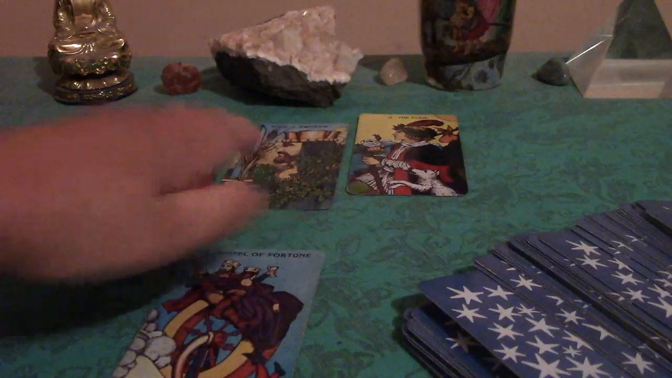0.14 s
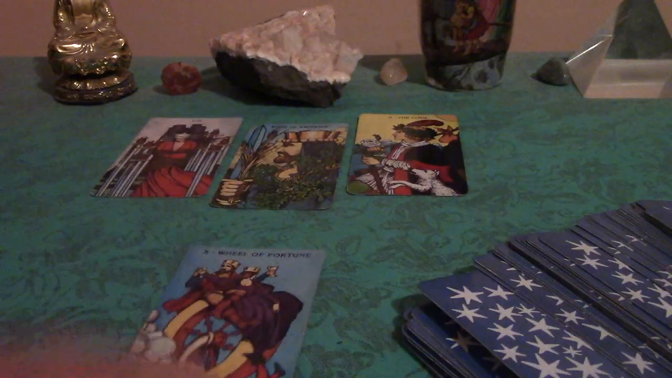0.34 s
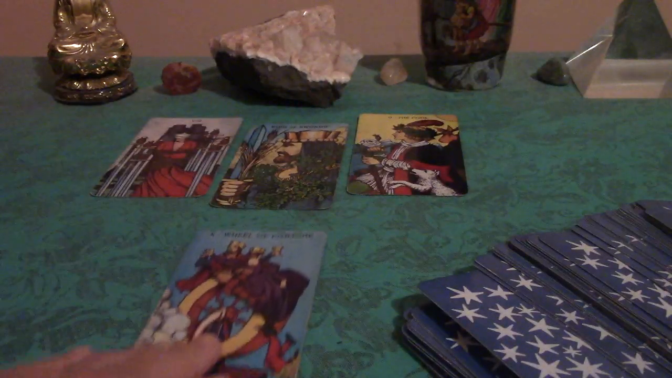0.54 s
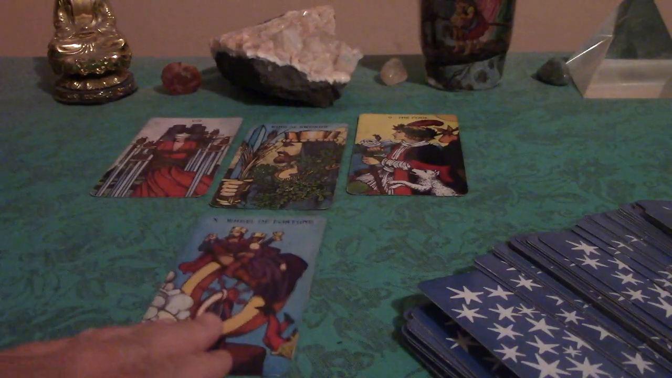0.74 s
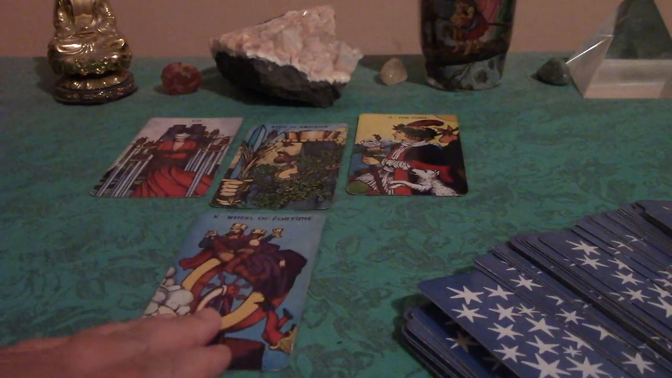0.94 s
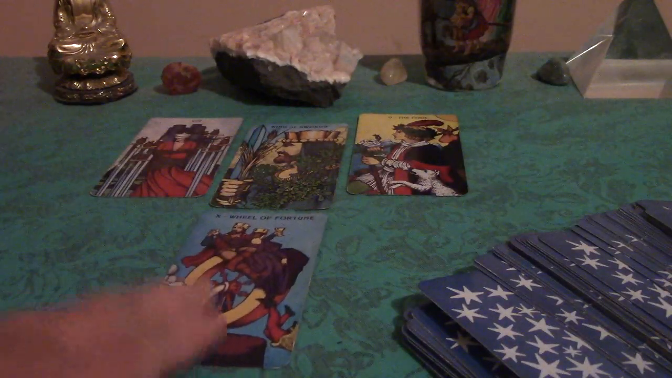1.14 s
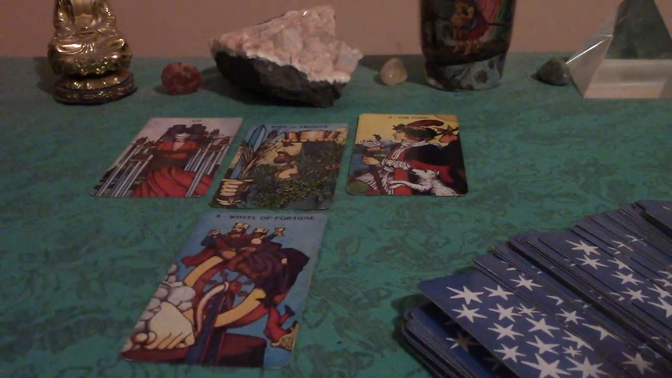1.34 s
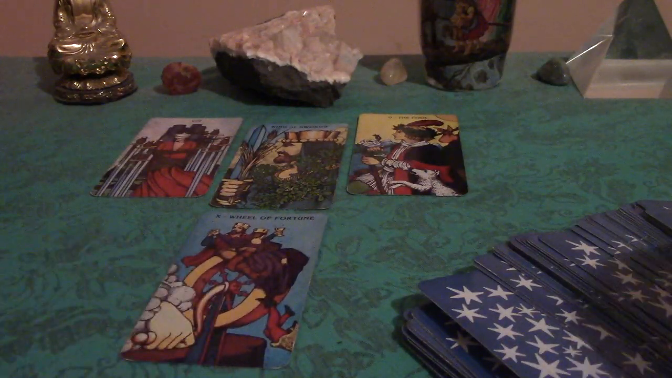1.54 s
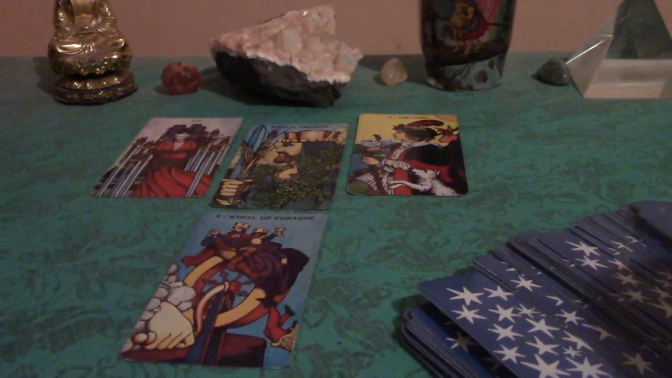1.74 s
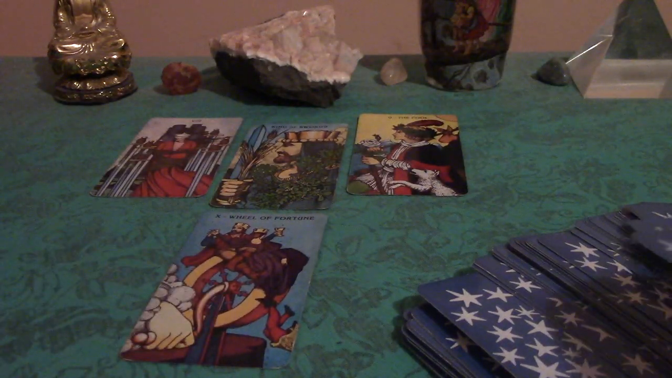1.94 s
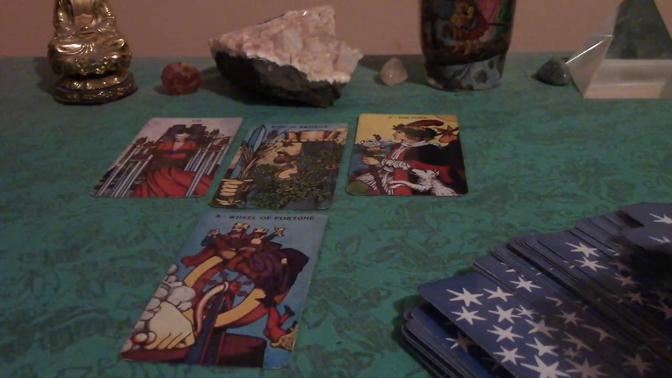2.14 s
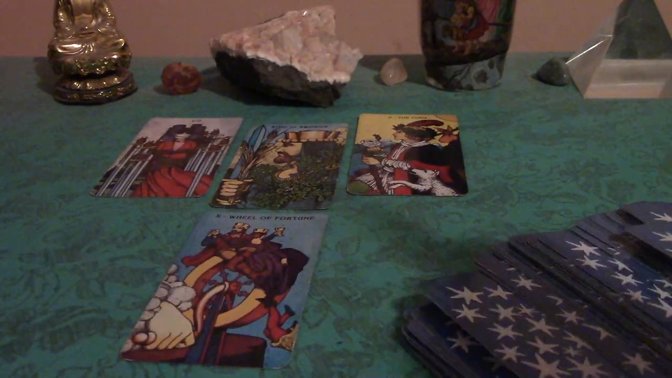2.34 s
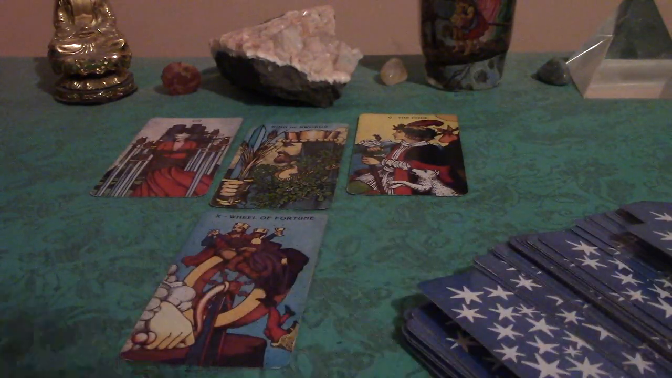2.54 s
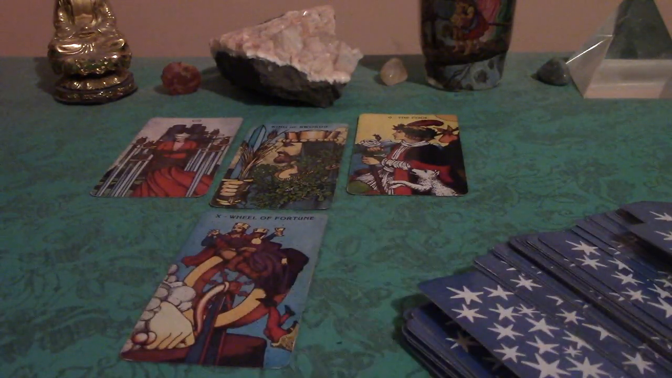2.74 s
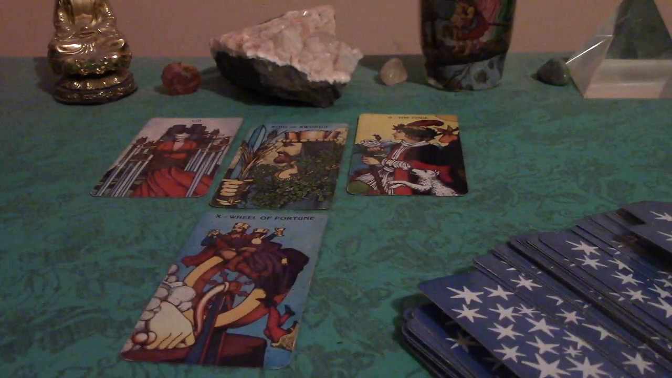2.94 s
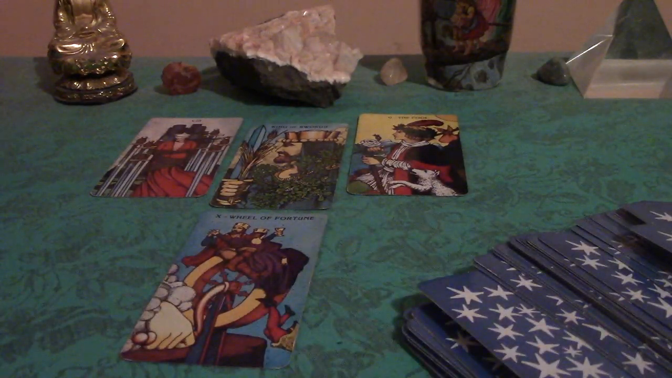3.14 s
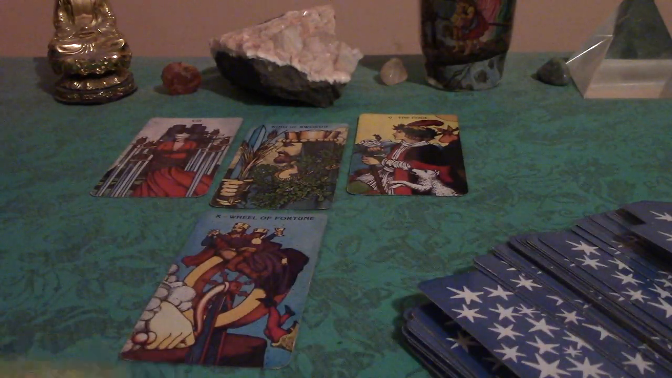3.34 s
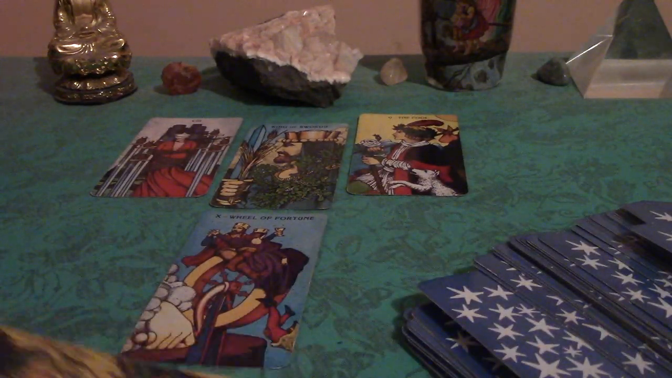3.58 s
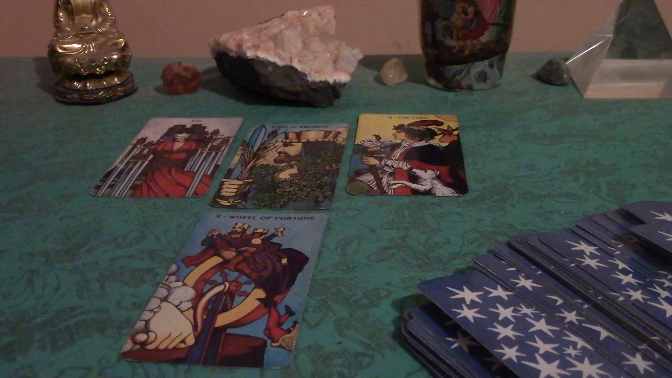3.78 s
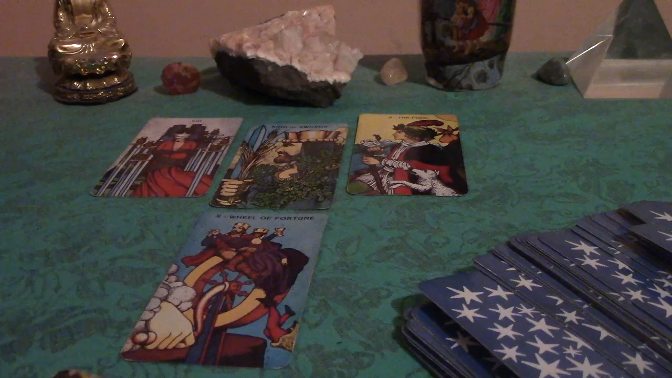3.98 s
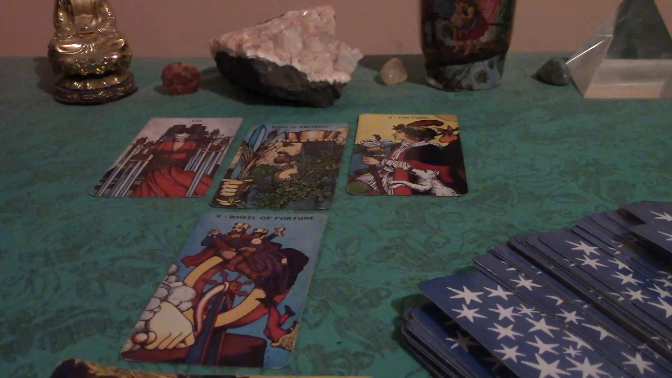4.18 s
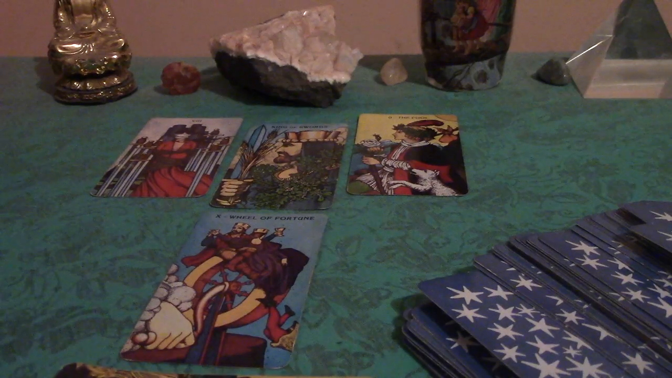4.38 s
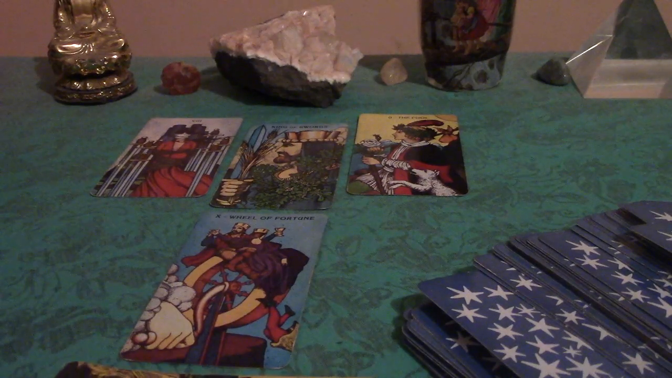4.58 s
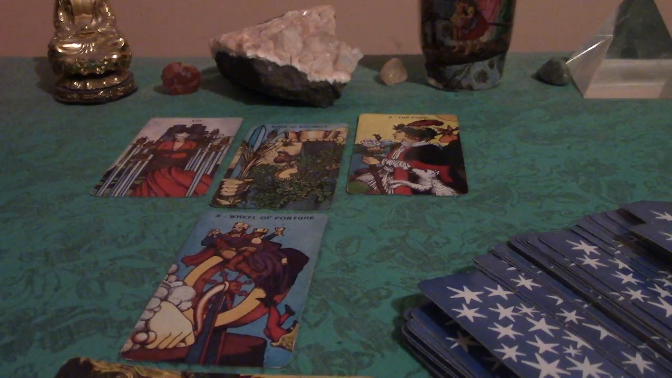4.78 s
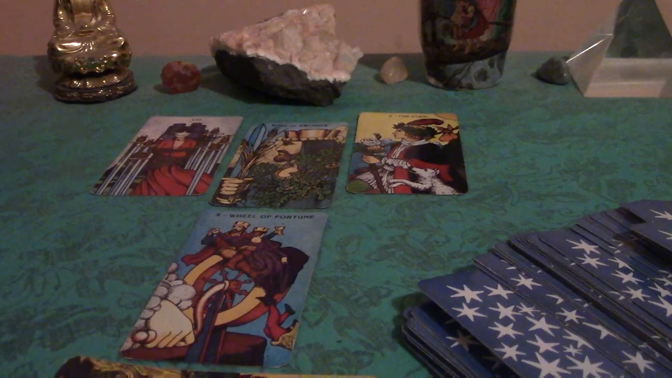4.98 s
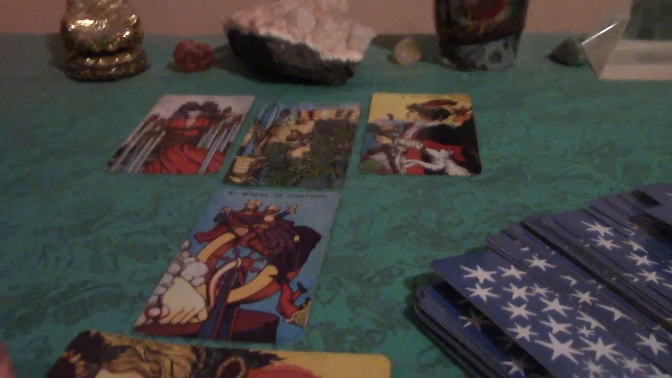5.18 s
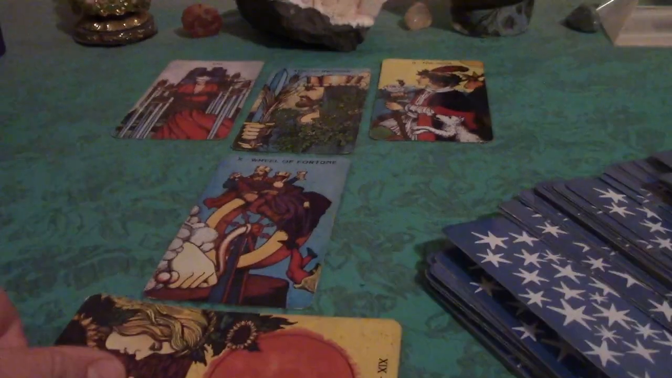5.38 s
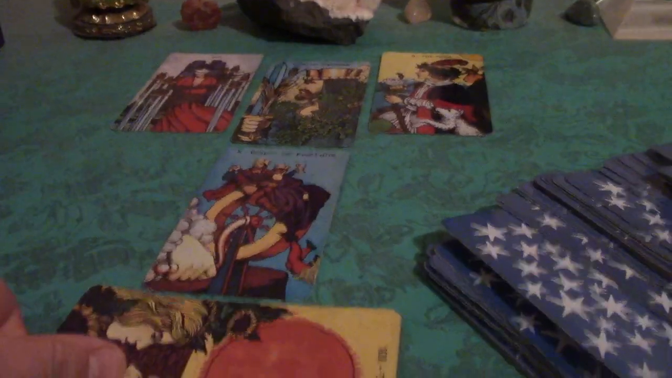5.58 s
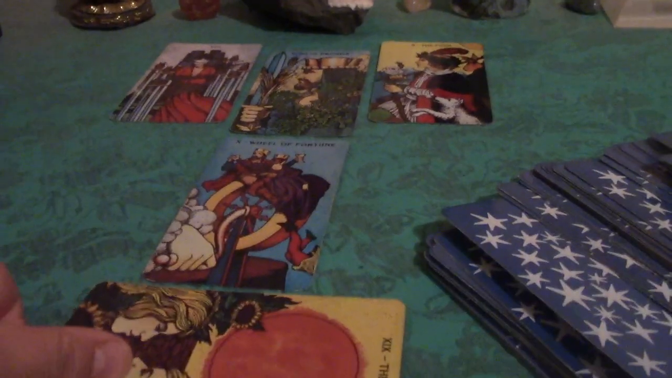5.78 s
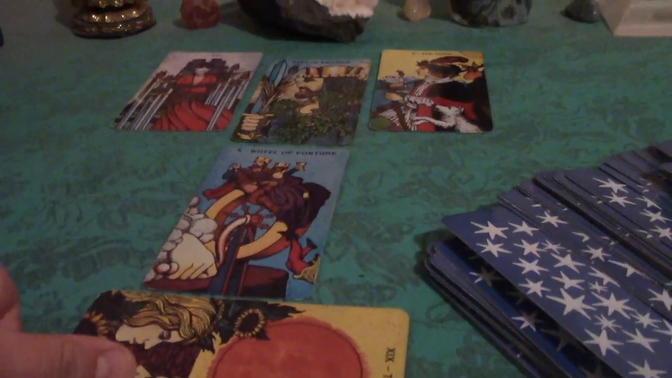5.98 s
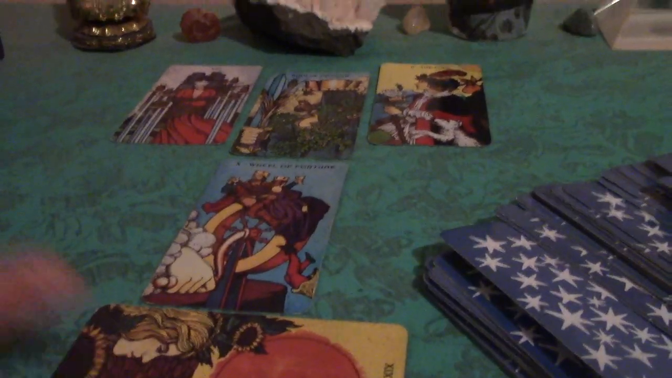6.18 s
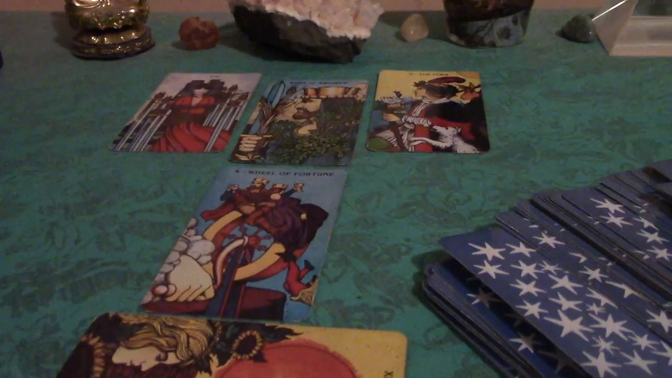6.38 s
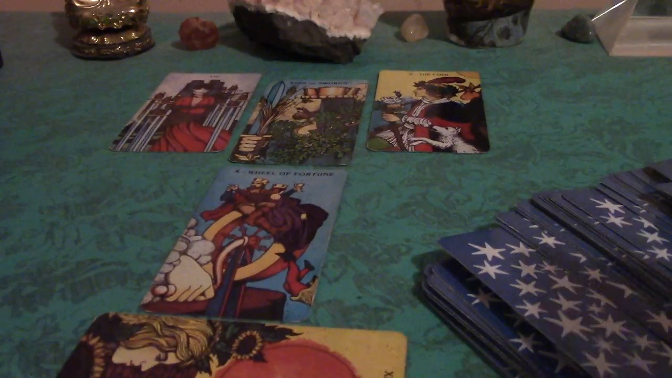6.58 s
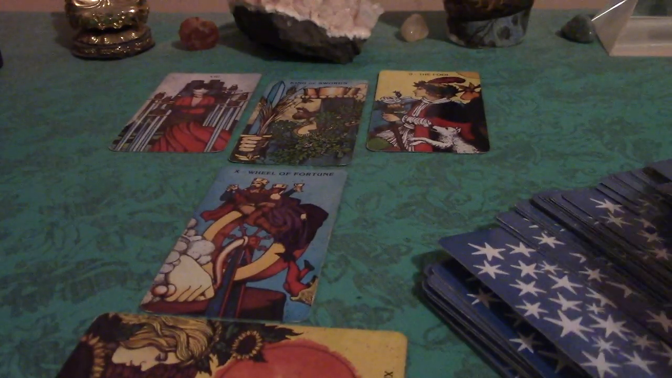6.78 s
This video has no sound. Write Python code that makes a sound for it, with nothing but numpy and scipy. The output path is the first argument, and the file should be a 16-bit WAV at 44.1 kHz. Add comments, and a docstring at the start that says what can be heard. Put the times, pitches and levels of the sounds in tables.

```python
"""A small, quiet room hums throughout. On a cloth-covered table, one tarot card is pushed into place;
another is drawn from the fanned deck, laid down and slid. Card faces hiss, card edges rasp, and fingers
and cards tap softly. Near 5 s a hand rubs a camera's plastic mount, very close by, and tilts it. The
joint sticks and slips, creaking in three flurries of sharp clicks. The fingertip squeaks as it lets go,
and two soft taps follow."""
import sys
import numpy as np
from scipy import signal
from scipy.fft import rfft, irfft, next_fast_len
from scipy.io import wavfile
from scipy.ndimage import map_coordinates

SR = 44100
rng = np.random.default_rng(int(sys.argv[2]) if len(sys.argv) > 2 else 0)


def wrap_up_sound(samples):
    """Save the sound to the file named by the first command line argument, as 16-bit audio."""
    columns = np.atleast_2d(samples).T
    # keep every value between -1 and 1, then stretch to whole-number steps
    tamed = np.clip(columns, -1, 1)
    steps = np.round(tamed * 32767).astype(np.int16)
    wavfile.write(sys.argv[1], SR, steps)


N = 300762

# tone of the room's hum: (frequency [Hz], level [dB])
HUM_TONE = [(12, -39.5), (20, -22.5), (96, -11.5), (120, 0), (154, -5), (204, 0), (367, -3.5), (446, -2.5),
            (660, -5.5), (1060, -7.5), (1260, -7.5), (1960, -13.5), (2910, -15.5), (8180, -22.5),
            (16000, -33)]
# stereo width of the room, then of direct sounds: (frequency [Hz], side minus middle [dB])
ROOM_WIDTH = [(30, -2.5), (100, -11), (400, -6), (3000, -8.5), (7000, -10.5), (14000, -31)]
DIRECT_WIDTH = [(40, -1), (100, -19), (300, -25), (600, -17), (1200, -15), (2400, -10), (4400, -18),
                (14000, -18)]
# how long the room echoes: (frequency [Hz], time to fade by 60 dB [s])
ECHO_TIMES = [(150, 0.4), (1000, 0.26), (5000, 0.17), (14000, 0.273)]

# cards sliding on cloth or on other cards: (start [s], end [s], fade time [s], hiss [dB], rasp [dB])
CARD_SLIDES = [(.335, .68, .11, -60, -68), (0.845, 1.08, .025, -68.5, -79), (1.53, 1.74, .04, -80, -69),
               (1.97, 2.32, .03, -67, -64), (2.078, 2.114, .018, -57.5, -59), (3.579, 3.78, .025, -60, -55),
               (3.79, 4.135, .014, -61, -63.5)]
# quick card strokes that swell and break off: (break time [s], swell time [s], hiss [dB], rasp [dB])
CARD_FLICKS = [(2.225, 0.027, -41.5, -39.5), (2.897, 0.042, -56, -52), (3.047, 0.058, -65, -49),
               (4.15, .08, -62, -75)]
# tone of a card's hissing face, then of its rasping edge: (frequency [Hz], level [dB])
HISS_TONE = [(1000, -32.5), (3000, 0), (4500, -2.5), (6000, 5.5), (8000, 3), (9500, -3), (11500, -5),
             (13000, -11), (16000, -11)]
RASP_TONE = [(150, -19), (400, -10), (1100, -0.5), (1900, 0), (2500, 1.5), (3400, -0.5), (5000, -9),
             (8000, -16), (15000, -42)]
# a scraping edge rings higher as the card is laid flat: (time [s], frequency [Hz])
EDGE_GLIDE = [(3.6, 2000), (3.73, 2750)]

# touches on the table: (time [s], level [dB], hardness [0 fingertip to 1 card edge], ring [Hz])
TABLE_TAPS = [(0.356, -49, 1.0, 3700), (1.089, -54.5, 0.96, 3700), (1.172, -46.0, 0.47, 380),
              (1.192, -47.5, 0.59, 447), (1.359, -46.5, 0.15, 574), (1.664, -58, 0.95, 3400),
              (2.003, -55, 0.87, 4270), (2.17, -50, 0.87, 4270), (2.272, -51.0, 0.87, 8000),
              (2.303, -41.5, 0.0, 540), (2.325, -49.5, 0.89, 950), (2.722, -46, 0.52, 443),
              (2.742, -50, 0.67, 465), (2.864, -40, 0.52, 497), (2.876, -40.0, 0.74, 1150),
              (2.888, -43, 0.71, 1150), (2.926, -48, 0.84, 1150), (2.932, -41, 0.81, 480),
              (3.016, -44.5, 0.59, 824), (3.041, -45.0, 0.49, 1740), (3.45, -47.0, 0.54, 355),
              (3.5205, -41, 0.3, 900), (3.5255, -35, 0.76, 1990), (3.539, -49, 1.0, 2300),
              (4.684, -48.5, 0.73, 432), (4.739, -45, 1.0, 1940), (6.417, -44.5, 0.17, 443),
              (6.436, -49.0, 0.51, 460)]
# overall tone of the table: (frequency [Hz], level [dB])
TABLE_TONE = [(40, -18.5), (130, -2), (430, 5), (900, 11), (2500, 5), (4500, -13), (8000, -11.5),
              (15000, -33.5)]
# pitches at which the hollow table top rings: (frequency [Hz], width [Hz], boost [dB])
TABLE_RINGS = [(205, 120, 7.5), (441, 190, 5), (666, 44, -0.5), (1080, 72, 2), (1788, 23, 5),
               (2530, 110, -3), (3230, 160, 1)]
# the four bands of a tap or click, called thud, knock, ring and snap: (bottom [Hz], top [Hz])
BANDS = [(70, 550), (550, 1500), (1500, 3600), (3600, 16000)]

# skin rubbing the mount as the hand pushes: (start [s], end [s], level [dB])
SKIN_RUBS = [(4.75, 5.0, -45), (5.0, 5.29, -54), (5.57, 5.62, -53), (5.93, 6.23, -58)]
# tone of rubbing skin: (frequency [Hz], level [dB])
SKIN_TONE = [(100, -18.5), (270, -1.5), (400, -13), (900, -13), (1400, -3), (2150, 2.5), (3400, -5),
             (5000, -11), (7000, -17.5), (15000, -32.5)]
# pitches at which the mount's plastic shell rings: (frequency [Hz], width [Hz], boost [dB])
MOUNT_RINGS = [(345, 150, 5), (769, 110, 4), (1099, 25, 2.5), (1680, 140, 1.5), (1816, 114, 6),
               (2382, 184, 5.5), (2620, 240, 3.5), (3155, 82, 4.5), (4000, 130, 6), (5250, 750, 3.5),
               (5860, 160, 5.5), (6100, 140, -1.5)]
# jerks of the mount's joint: (time [s], level [dB], hardness [0 dull thud to 1 sharp snap], ring [Hz])
MOUNT_CLICKS = [(5.002, -26.5, 0.33, 1880), (5.0171, -20.5, 0.41, 390), (5.0235, -25.5, 0.17, 1100),
                (5.032, -21.0, 0.88, 2440), (5.046, -31.0, 0.66, 2500), (5.067, -38, 0.1, 270),
                (5.078, -30.0, 0.69, 1320), (5.133, -29.5, 0.73, 2500), (5.1414, -31.0, 0.51, 1930),
                (5.161, -35.5, 0.19, 327), (5.166, -21.5, 0.72, 5350), (5.1839, -25.5, 0.7, 5500),
                (5.192, -34, 0.3, 1830), (5.22, -25.5, 0.78, 3170), (5.232, -27.5, 0.58, 350),
                (5.2389, -23.5, 0.8, 6020), (5.265, -21.5, 0.65, 350), (5.2695, -25, 0.4, 420),
                (5.2843, -35, 0.54, 1660), (5.2915, -32.0, 0.69, 1100), (5.314, -43, 0.3, 1830),
                (5.471, -40.5, 0.34, 1100), (5.4792, -43, 0.43, 2230), (5.5496, -19.0, 0.86, 6000),
                (5.5646, -17.0, 0.73, 2420), (5.577, -19, 0.87, 1090), (5.586, -24.5, 0.78, 6350),
                (5.5897, -25.5, 0.84, 340), (5.904, -27.5, 0.7, 5500), (5.937, -23.0, 0.29, 1690),
                (5.9555, -19.5, 0.87, 5500), (5.995, -23.5, 0.79, 6100), (6.0145, -28, 0.23, 364),
                (6.0323, -25.0, 0.69, 6070), (6.084, -24, 0.72, 6130), (6.099, -33, 0.04, 370),
                (6.113, -22.5, 0.54, 2070), (6.1484, -32.0, 0.22, 360), (6.153, -32.0, 0.67, 5280),
                (6.17, -23.0, 0.79, 2670), (6.203, -36.5, 0.52, 1870), (6.2115, -35.0, 0.06, 394),
                (6.247, -39, 0.14, 1820)]
# overall tone of the plastic: (frequency [Hz], level [dB])
PLASTIC_TONE = [(40, -17), (140, 0.5), (300, 5.5), (550, -1.5), (2000, 2.5), (4400, -3.5), (6200, 1),
                (8000, -7), (11000, -13.5), (13000, -13.5), (16000, -25.5)]
# the clicks ring a little louder on the right: (frequency [Hz], left minus right [dB])
MOUNT_BALANCE = [(700, 0), (1300, 0), (2400, -1.5), (4400, -1), (8000, 0)]
# stretches in which the joint creeps in faint slips: (start [s], end [s], average level [dB])
CREEP_SPANS = [(5.03, 5.3, -47), (5.38, 5.45, -54), (5.92, 6.26, -52)]
# pitches of the fingertip's squeak: (frequency [Hz], width [Hz], boost [dB])
SQUEAK_RINGS = [(1805, 70, 11), (2910, 100, 13.5), (5680, 140, 14)]


def amp(db):
    """Turn decibels into a gain."""
    return 10 ** (np.asarray(db) / 20)


def along(points, hz):
    """Read between a table's (frequency, value) points, with octaves evenly spaced."""
    freqs, values = np.transpose(points)
    return np.interp(np.log(hz + 1), np.log(freqs + 1), values)


def wobble(per_s):
    """A smooth curve through per_s random values a second."""
    values = rng.standard_normal(int(N * per_s / SR) + 4)
    return map_coordinates(values, [np.arange(N) * per_s / SR])


def filtered(x, gain_at):
    """Turn each frequency of x up or down by gain_at(hz)."""
    size = next_fast_len(N + SR // 2)
    hz = np.fft.rfftfreq(size, 1 / SR)
    return irfft(rfft(x, size) * gain_at(hz), size)[..., :N]


def peak(hz, centre, width, db):
    """A rounded bump in dB around one frequency."""
    return db / (1 + (2 * (hz - centre) / width) ** 2)


def body_gain(tone, rings):
    """An object's gain by frequency: its overall tone plus the pitches it rings at."""
    return lambda hz: amp(along(tone, hz) + sum(peak(hz, *ring) for ring in rings))


def ring_after(gain):
    """A filter with this gain that rings only after the blow (minimum phase)."""
    cepstrum = irfft(np.log(np.maximum(gain, 1e-6)))
    half = cepstrum.shape[-1] // 2
    fold_forward = np.r_[1, np.full(half - 1, 2), 1, np.zeros(half - 1)]
    return np.exp(rfft(cepstrum * fold_forward))


def stereo(pair, width):
    """Make left and right from a middle signal and a weaker side signal."""
    side = filtered(pair[1], lambda hz: amp(along(width, hz)))
    return np.array([pair[0] + side, pair[0] - side])


def noise(tone, width, grain_db, rings=()):
    """Stereo noise of average power 1; grain_db roughens it, like tiny fibres catching."""
    grains = rng.standard_normal((2, N)) * amp(grain_db * wobble(900))
    shaped = stereo(filtered(grains, body_gain(tone, rings)), width)
    return shaped / np.sqrt(np.mean(shaped ** 2) + 1e-20)


def stroke(start, end, attack_s, fade_s):
    """A hand movement: it picks up speed, holds, and dies away after its end."""
    t = np.arange(N) / SR
    return np.clip((t - start) / attack_s, 0, 1) * np.exp(-np.maximum(t - end, 0) / fade_s)


def room_hum():
    """The air of the room hums steadily, wavering a little."""
    return amp(-58 + 0.42 * wobble(3.32)) * noise(HUM_TONE, ROOM_WIDTH, grain_db=0.84)


def card_friction():
    """Card faces hiss and edges rasp, in slow slides and quick flicks."""
    t = np.arange(N) / SR
    hiss, rasp, scrape = np.zeros((3, N))
    settle_db_per_s = 13.5  # the edge rasps less as the card settles flat
    for start, end, fade_s, hiss_db, rasp_db in CARD_SLIDES:
        speed = stroke(start, end, attack_s=0.035, fade_s=fade_s)
        hiss += amp(hiss_db) * speed
        scrape += amp(rasp_db - settle_db_per_s * np.maximum(t - start, 0)) * speed
    for end, swell_s, hiss_db, rasp_db in CARD_FLICKS:
        swell = np.exp(-2 * (np.minimum(t - end, 0) / swell_s) ** 2)
        speed = swell * np.exp(-np.maximum(t - end, 0) / 0.0019)
        hiss += amp(hiss_db) * speed
        rasp += amp(rasp_db) * speed
    return (hiss * noise(HISS_TONE, DIRECT_WIDTH, grain_db=1.4)
            + rasp * noise(RASP_TONE, DIRECT_WIDTH, grain_db=1.5)
            + scrape * edge_scrape(width_hz=800, boost_db=12))


def edge_scrape(width_hz, boost_db):
    """A card edge scrapes the cloth; its ring rises as one pitch fades into the next."""
    times, pitches = np.transpose(EDGE_GLIDE)
    scrape = np.zeros((2, N))
    for hz, turn in zip(pitches, np.eye(len(times))):
        share = np.interp(np.arange(N) / SR, times, turn)
        rasp = noise(RASP_TONE, DIRECT_WIDTH, grain_db=2.0, rings=[(hz, width_hz, boost_db)])
        scrape += np.sqrt(share) * rasp
    return scrape


def band_mix(below_db, above_db, favour_db):
    """Harder hits sound brighter: hardness picks the main band, and the ringing band gets a lift."""
    def gains(hardness, ring_hz):
        low, high = np.transpose(BANDS)
        step = np.arange(len(low)) - hardness * (len(low) - 1)
        falloff_db = np.where(step < 0, below_db * step, -above_db * step ** 2)
        ringing = (low <= ring_hz) & (ring_hz < high)
        gain = amp(falloff_db + favour_db * ringing)
        return gain / np.linalg.norm(gain)
    return gains


def hits(rows, body, mix, rise_s, hold_s, fade_s, jolt_db, ring_db, ring_sharpness):
    """Each hit shakes an object with a jolt and tiny slips; fade_s and jolt_db go band by band."""
    size, uneven_db = 4096, 4.5
    t = np.arange(size) / SR
    hz = np.fft.rfftfreq(size, 1 / SR) + 1
    bands = np.array([body(hz) / np.sqrt((1 + (low / hz) ** 8) * (1 + (hz / high) ** 12))
                      for low, high in BANDS])
    out = np.zeros((2, N + size))
    for start, level_db, hardness, ring_hz in rows:
        touch_s = hold_s * np.clip(1 - hardness, 0, 1)  # a softer touch lasts longer
        fade = amp(-60 * np.maximum(t - touch_s, 0) / np.array(fade_s)[:, None])
        burst = (1 - np.exp(-t / rise_s)) * fade
        slips = burst * rng.standard_normal((2, 1, size)) * amp(uneven_db * rng.standard_normal(size))
        slips /= np.linalg.norm(slips, axis=-1, keepdims=True)
        slips[0, :, round(rise_s * SR)] += amp(jolt_db)
        # the spot that is hit brings out one pitch
        ring = amp(peak(hz, ring_hz, 100 + ring_hz / ring_sharpness, ring_db))
        parts = irfft(rfft(slips) * ring_after(bands * ring))
        # give each band the energy of 10 ms at power 1
        parts /= np.sqrt(np.sum(parts ** 2, axis=-1, keepdims=True) / (SR / 100))
        hit = np.sum(parts * mix(hardness, ring_hz)[:, None], axis=1)
        first = round(start * SR)
        out[:, first:first + size] += amp(level_db) * hit
    return stereo(out[:, :N], DIRECT_WIDTH)


def table_taps():
    """Fingers and cards knock the hollow table top, softened by the cloth."""
    mix = band_mix(below_db=1.0, above_db=22.5, favour_db=6.0)
    return hits(TABLE_TAPS, body_gain(TABLE_TONE, TABLE_RINGS), mix,
                rise_s=0.0008, hold_s=0.005, fade_s=[0.033, 0.07, 0.038, 0.024],
                jolt_db=[-4, -4, -8, -12], ring_db=8, ring_sharpness=16)


def skin_friction():
    """The hand rubs the plastic shell with every push and rustles faintly while resting on it."""
    resting_grip = (4.7, 6.5, -66)
    effort = sum(amp(db) * stroke(start, end, attack_s=0.029, fade_s=0.0106)
                 for start, end, db in SKIN_RUBS + [resting_grip])
    flutter = amp(0.99 * wobble(45))
    return effort * flutter * noise(SKIN_TONE, DIRECT_WIDTH, grain_db=1.5, rings=MOUNT_RINGS)


def mount_creak():
    """The joint sticks, then slips in jerks, and each jerk rings the plastic shell."""
    mix = band_mix(below_db=5.5, above_db=5, favour_db=5)
    clicks = hits(MOUNT_CLICKS + joint_creep(), body_gain(PLASTIC_TONE, MOUNT_RINGS), mix,
                  rise_s=0.0007, hold_s=0.0038, fade_s=[0.031, 0.036, 0.024, 0.014],
                  jolt_db=[0, -5, -2, -6.5], ring_db=5.5, ring_sharpness=7.1)
    left_right = np.array([[0.5], [-0.5]])
    return filtered(clicks, lambda hz: amp(along(MOUNT_BALANCE, hz) * left_right))


def joint_creep(per_s=45, scatter_db=2.5, hardness=0.35, ring_hz=1850):
    """Extra click rows: the turning joint also makes faint slips at random moments."""
    return [(rng.uniform(start, end), db + scatter_db * rng.standard_normal(), hardness, ring_hz)
            for start, end, db in CREEP_SPANS for _ in range(round((end - start) * per_s))]


def finger_squeak():
    """The fingertip lets go of the mount with a light hiss and a few narrow, squeaky pitches."""
    squeak = amp(-43) * noise(SKIN_TONE, DIRECT_WIDTH, grain_db=1.5, rings=SQUEAK_RINGS)
    hiss = amp(-55) * noise(HISS_TONE, DIRECT_WIDTH, grain_db=2.0)
    return stroke(start=6.302, end=6.329, attack_s=0.0088, fade_s=0.0035) * (squeak + hiss)


def room_echo(x, build_s=0.0044):
    """The walls answer within a few milliseconds, and the bass lingers longest."""
    hz, t, spectrum = signal.stft(rng.standard_normal((2, SR // 2)), SR, nperseg=256)
    fade = amp(-60 * t / along(ECHO_TIMES, hz)[:, None])
    tail = signal.istft(spectrum * fade, SR, nperseg=256)[1]
    tail *= 1 - np.exp(-np.arange(tail.shape[1]) / SR / build_s)
    tail /= np.linalg.norm(tail[0])
    echo = signal.fftconvolve(x.mean(axis=0)[None], tail, axes=1)[:, :N]
    return stereo(echo, ROOM_WIDTH)


def scene():
    """The creak is very close and has little echo; the taps and rubbing carry more of the room."""
    creak = mount_creak()
    taps = table_taps()
    pressure = amp(0.85 * wobble(30))  # a hand never presses evenly
    handling = taps + pressure * (card_friction() + skin_friction() + finger_squeak())
    echo = amp(-22) * room_echo(creak) + amp(-10.5) * room_echo(handling)
    return creak + handling + echo + room_hum()


def record(dry):
    """Cut away the very highest treble."""
    top_hz = 16000
    return filtered(dry, lambda hz: 1 / np.sqrt(1 + (hz / top_hz) ** 120))


dry = scene()
out = record(dry)
wrap_up_sound(out)
```